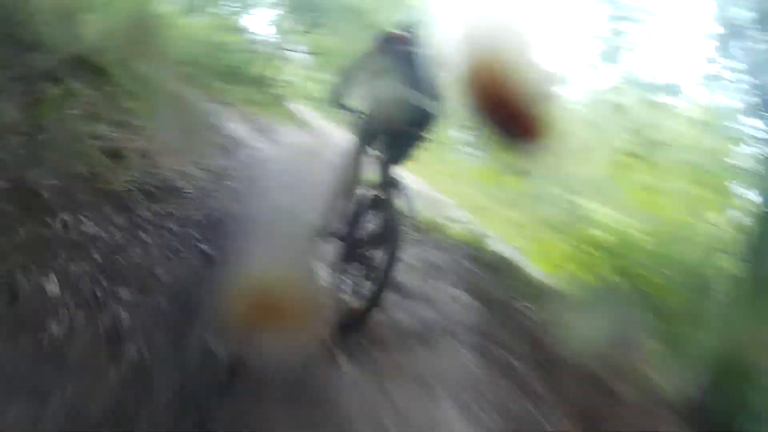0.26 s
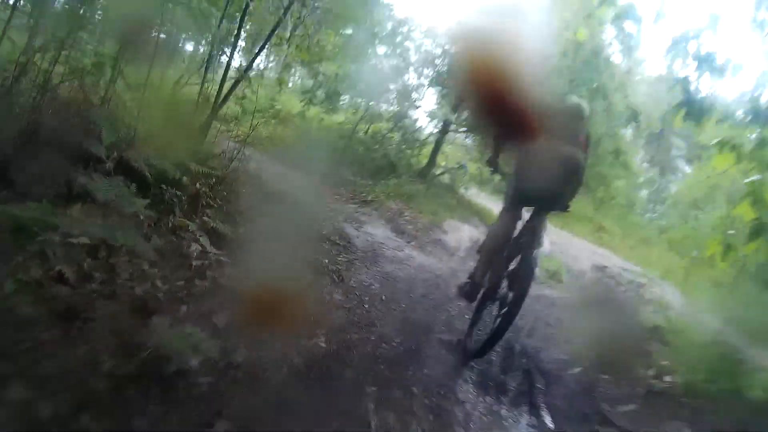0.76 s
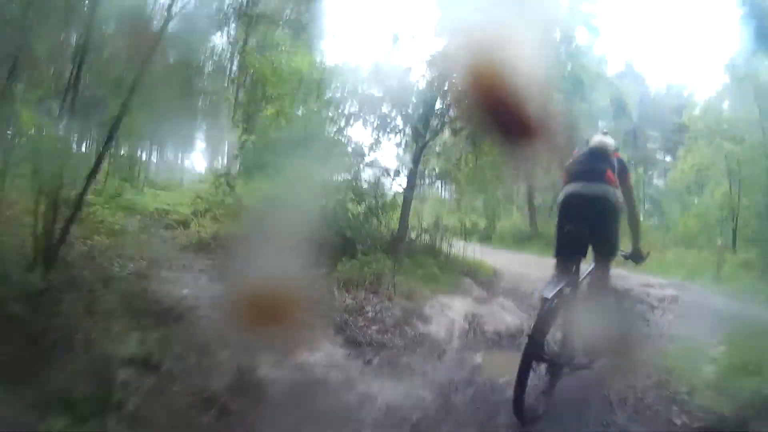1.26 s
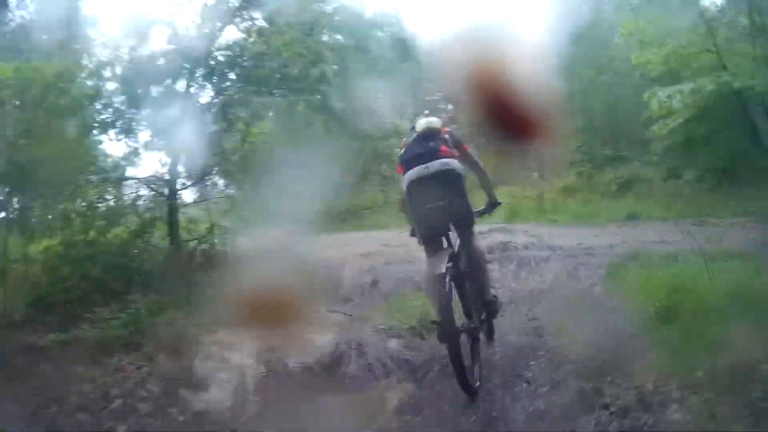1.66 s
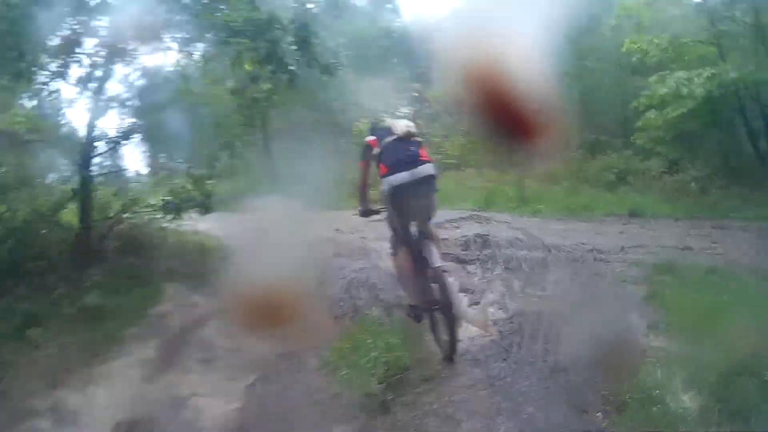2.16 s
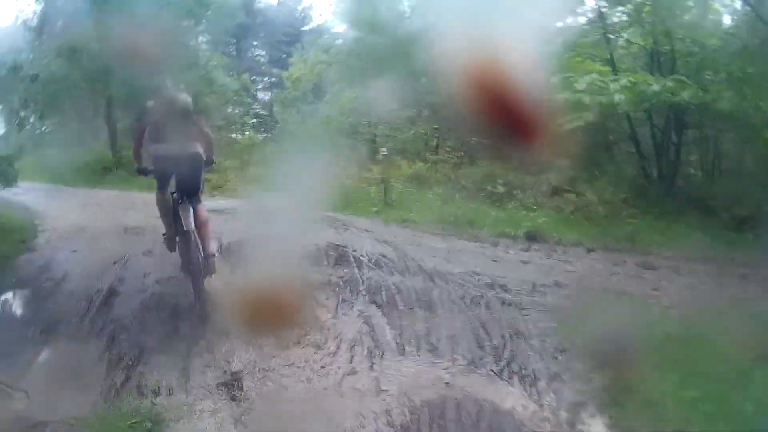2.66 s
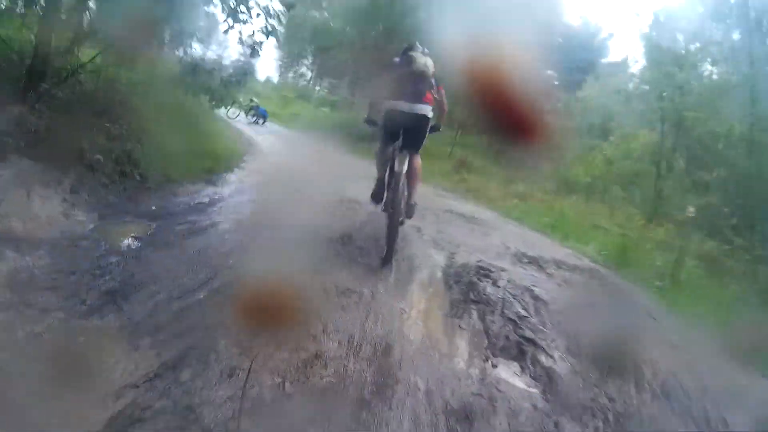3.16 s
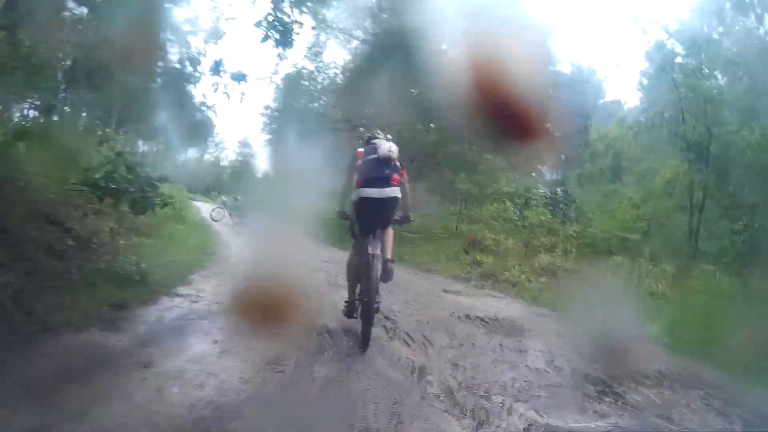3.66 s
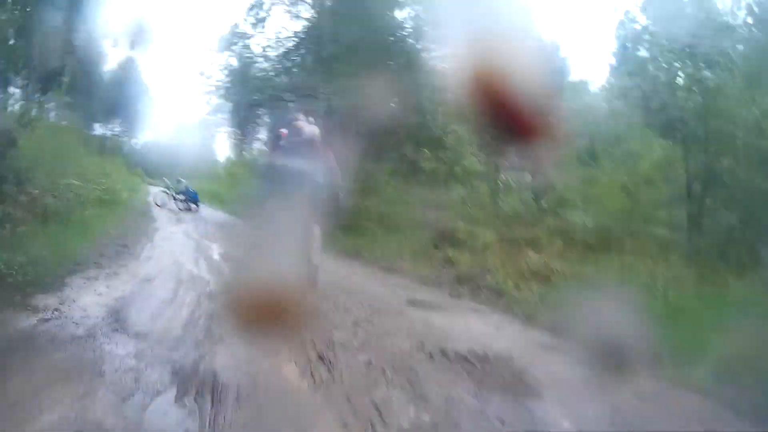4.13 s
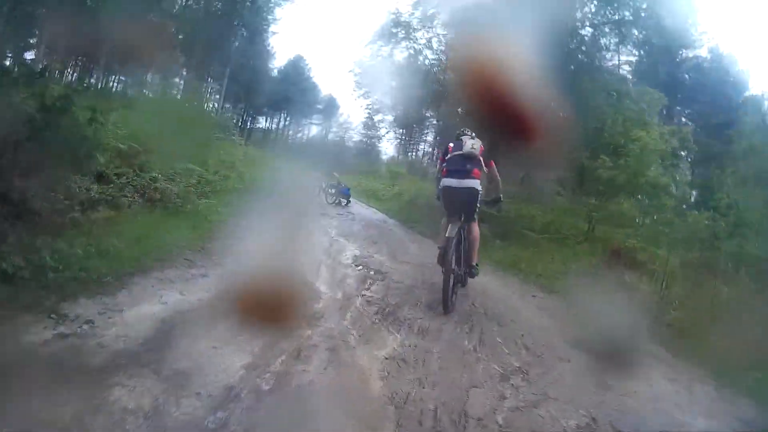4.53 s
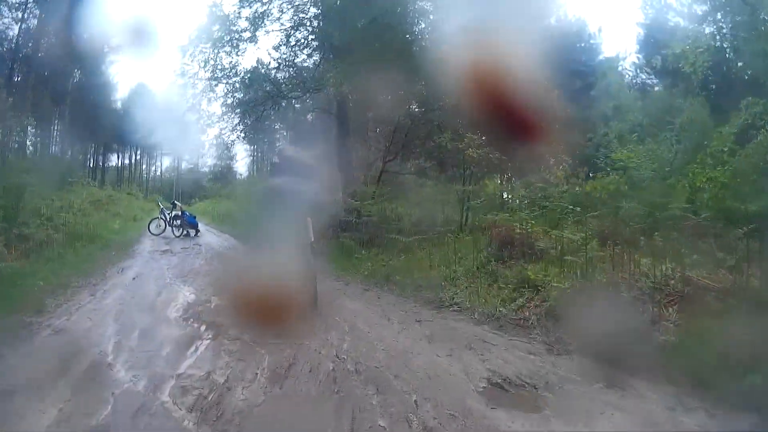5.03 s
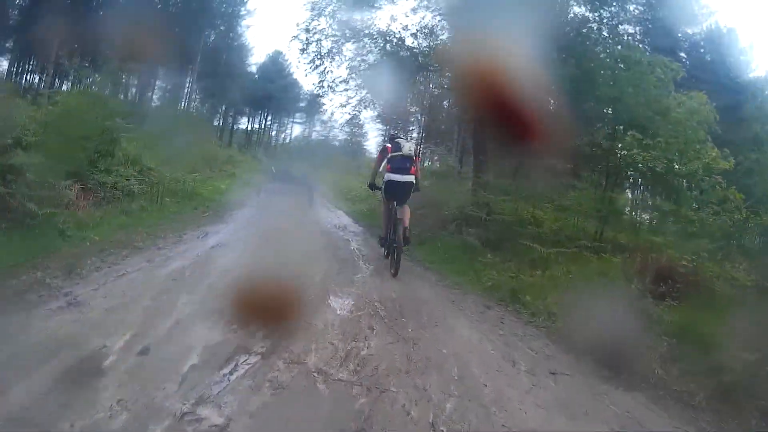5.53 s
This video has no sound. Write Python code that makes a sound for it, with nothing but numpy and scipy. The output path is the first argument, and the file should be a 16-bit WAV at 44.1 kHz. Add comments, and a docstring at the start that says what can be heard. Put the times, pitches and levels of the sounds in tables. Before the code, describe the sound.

Muffled rumble and shudder of a mountain bike riding over mud and grit, with thumps, chain clacks and brief brake disc rings.

```python
"""A mountain bike rides fast down a wet forest trail, heard from a camera in a sealed housing fixed to it.
From the start, tyres and wind rumble, the camera mount shudders near 50 Hz and a low hum dies away.
Bumps thump, the chain slaps the frame, and grit and spray swell in puddles and fade over crests.
After two seconds a brake disc rings now and then. The hardest hits come near three and four seconds,
and the camera turns them down. Then the shudder eases, and a last few slaps end the ride."""
import sys
import numpy as np
from scipy import signal
from scipy.fft import rfft, irfft, next_fast_len
from scipy.io import wavfile
from scipy.ndimage import uniform_filter1d, minimum_filter1d, map_coordinates

SR = 44100
rng = np.random.default_rng(int(sys.argv[2]) if len(sys.argv) > 2 else 0)


def master_out(mix):
    """Clip the mix to full scale and print it as 16-bit PCM to the path in sys.argv[1]."""
    frames = np.transpose(np.atleast_2d(mix))
    ceiling = np.clip(frames, -1, 1)
    pcm = np.round(ceiling * 32767).astype(np.int16)
    wavfile.write(sys.argv[1], SR, pcm)


N = 255308

# Levels in the tables are relative. A fade time (t60) is how long a sound takes to drop by 60 dB.
# The headwind. Each row: time in seconds, level in dB.
HEADWIND = [(0, -39), (0.95, -36), (1.35, -39.5), (2.1, -44.5), (3.1, -32), (3.7, -43), (4.05, -32),
            (4.45, -45), (5.35, -50), (5.79, -46)]
# The trail under the bike. Each row: time in seconds, then shudder, rumble, grit and spray in dB.
TRAIL = [(0, -25, -35, -47.5, -56), (0.9, -24.5, -35, -42.5, -61), (1.35, -27.5, -38, -45, -61.5),
         (1.8, -27.5, -39, -44, -54), (2.8, -26.5, -39, -43.5, -54.5), (3.4, -30, -36.5, -43, -58.5),
         (4.2, -30, -38, -46, -59.5), (4.5, -30, -40, -45.5, -59), (4.9, -31, -39, -42.5, -59),
         (5.79, -38, -40, -44, -59.5)]
# Crests where the tyres go light. Each row: middle and length in seconds, drop in dB.
CRESTS = [(0.202, 0.041, 8.5), (0.674, 0.13, 6.5), (1.218, 0.11, -0.5), (2.106, 0.057, 8.5), (3.26, .09, 2),
          (4.464, 0.12, 9), (4.632, 0.11, 9), (5.301, 0.073, 5)]
# Mud and water. Each row: middle and length in seconds, then change in grit and in spray in dB.
PUDDLES = [(0.433, 0.25, 5.5, 2), (0.816, 0.097, 1.5, 4), (1.1, 0.061, 5.5, 5.5), (1.536, 0.062, 10, 11),
           (2.005, 0.18, 5.5, -0.5), (2.18, 0.11, 3.5, -2), (2.313, 0.076, 5, -7.5), (2.459, 0.051, 8.5, 6),
           (2.944, 0.078, -2.5, 9.5), (3.059, 0.042, 6.5, 5), (3.78, 0.087, 7.5, 2.5),
           (4.03, 0.038, 14, 13), (4.185, 0.11, 6.5, 5.5), (4.81, .08, 3, 1), (5.07, 0.045, 3, -1),
           (5.172, .08, 0.5, 3), (5.351, 0.052, 6.5, 4), (5.557, 0.068, 3.5, 2.5)]
# Drops and mud striking the housing. Each row: start in seconds, level in dB, fade time in seconds.
SPLASHES = [(3.194, -43, 0.037), (3.936, -47.5, 0.019), (4.01, -38.5, 0.036), (4.023, -45, 0.11),
            (4.038, -30.5, 0.0062), (4.044, -41, 0.019), (4.331, -54, .012)]
# The brake disc. Each row: start in seconds, level in dB, pitch in Hz, fade time in seconds.
DISC_RINGS = [(2.31, -42.5, 2110, .29), (2.66, -36.5, 1638, 0.19), (4.33, -58, 2880, .25),
              (4.564, -28, 1636, 0.099), (4.566, -45, 2860, 0.082), (4.72, -33.5, 1710, .22),
              (4.722, -46, 2100, .14), (5.15, -51, 2860, 0.37), (5.335, -35, 1700, 0.092)]
# Chain and stones hitting the frame. Each row: time in seconds, level in dB, brightness in dB.
FRAME_HITS = [(0.1496, -23, -30), (0.4504, -26, -37), (0.5032, -26, -31), (0.829, -15.5, -30),
              (0.8679, -24.5, -39), (1.0788, -28, -31), (1.105, -27.5, -34), (1.2703, -21.5, -22.5),
              (2.14, -30, -41), (2.4474, -25, -32), (3.1107, -21, -39), (3.1951, -10, -24),
              (3.2003, -25, -13.5), (3.3645, -24, -51), (3.6396, -24.5, -23), (3.6845, -26, -38),
              (3.7193, -22, -45), (3.7499, -14.5, -34), (3.7696, -14.5, -33), (3.8053, -20, -16),
              (4.0148, -21.5, -16), (4.0422, -11, -22), (4.051, -17, -23), (4.5625, -31.5, -25),
              (4.788, -21, -22), (5.0045, -23, -45), (5.1446, -23, -15.5), (5.4286, -25, -43),
              (5.5229, -13, -32), (5.5624, -17, -30), (5.5912, -12, -23), (5.6358, -21.5, -40)]
# Bumps in the trail. Each row: start in seconds, level in dB, pitch in Hz, fade time in seconds.
BUMPS = [(.531, -13.5, 160, 0.049), (0.8, -19, 135, .06), (.938, -29, 226, 0.031), (1.104, -8, 235, 0.03),
         (1.503, -20.5, 212.7, 0.17), (1.915, -25.5, 387, 0.099), (1.967, -29, 519, 0.13),
         (2.331, -25, 223, 0.082), (2.564, -21, 190, 0.025), (2.888, -23, 200, 0.031),
         (2.972, -22.5, 223, 0.029), (3.117, -18, 310, 0.011), (3.205, -5, 145, 0.032),
         (3.307, -9, 230, 0.011), (3.469, -18, 170, 0.048), (3.572, -22, 230, 0.024),
         (3.8, -15.5, 214, .058), (3.963, -13, 198, 0.021), (4.003, -19.5, 130, 0.06),
         (4.037, 3, 221, .014), (4.102, -11.5, 216, 0.035), (4.195, -11, 178, 0.021),
         (4.794, -15.5, 410, 0.076), (4.826, -26.5, 700, 0.088), (5.601, -25.5, 429, 0.26),
         (5.603, -28, 130, 0.07)]
# Rough ground that shakes the mount. Each row: start and length in seconds, level in dB.
ROUGH_STRETCHES = [(0.01, 0.088, -20.5), (0.29, 0.1, -36), (0.505, .08, -11.5), (1.106, 0.095, -16),
                   (1.177, .06, -12.5), (1.51, 0.073, -10.5), (1.751, 0.051, -21.5), (1.986, 0.079, -20),
                   (2.441, 0.035, -14), (2.54, 0.076, -23), (2.718, 0.18, -27), (3.045, 0.11, -19),
                   (3.173, 0.073, -10.5), (3.342, 0.21, -16.5), (3.794, 0.025, -17.5), (4.033, 0.021, -9.5),
                   (4.175, 0.05, -17.5)]
# How the frame and the thin housing walls ring. Each row: pitch in Hz, width in Hz, level in dB.
FRAME_MODES = [(420, 29, 4), (738, 48, -1), (796, 37, -4), (1019, 106, 5), (1348, 250, 3), (1613, 166, 5),
               (2490, 167, -9), (2490, 210, -5.5)]
WALL_MODES = [(2043, 67, 0.5), (2253, 132, 1.5), (2723, 96, 1.5), (2893, 60, 2), (3596, 180, -2),
              (3860, 78, 2.5), (4080, 74, -4), (4345, 160, -10)]
# The tone of each noise, from bass to treble. Each row: frequency in Hz, level in dB.
HISS_TONE = [(100, -3), (4500, 1), (6500, 1), (8500, 0.5), (14500, -0.5), (15700, -7.5)]
WIND_TONE = [(15, -23.5), (32, -11), (60, 8), (85, -3), (130, -6.5), (190, -2), (260, -17), (400, -36),
             (1000, -70)]
RUMBLE_TONE = [(30, -4), (90, -5), (140, -8.5), (220, 2), (290, -4.5), (340, -3.5), (410, 2), (480, -1.5),
               (560, -19), (700, -31.5), (1500, -52)]
GRIT_TONE = [(300, -23), (610, -6.5), (685, 0), (750, -9.5), (815, -2), (875, -11), (1010, -0.5),
             (1170, -6.5), (1410, 2.5), (1560, -2.5), (1730, -0.5), (1830, -6.5), (1940, -27.5),
             (4500, -53)]
SWAY_TONE = [(8, -24), (20, -3.5), (35, 0), (55, 1), (78, -6), (110, -20), (250, -35.5), (800, -85.5)]

CREST_SHARE = 0.8  # over a crest, rumble and shudder drop less than the grit


def amp(db):
    """Turn decibels into a volume factor."""
    return 10 ** (np.asarray(db) / 20)


def unit(x):
    """Scale a sound to an average (rms) level of 1."""
    return x / np.sqrt(np.mean(x ** 2) + 1e-20)


def peaked(x):
    """Scale a sound so its highest peak is 1."""
    return x / np.max(np.abs(x))


def curves(rows):
    """Join a table's rows with straight lines: one curve for each column after the time."""
    times, *columns = np.transpose(rows)
    return [np.interp(np.arange(N) / SR, times, column) for column in columns]


def wobble(rate):
    """A smooth curve through `rate` random values a second."""
    return map_coordinates(rng.standard_normal(int(N * rate / SR) + 4), [np.arange(N) * rate / SR])


def swell(middle, length):
    """A smooth hill of height 1, `length` seconds wide at half height."""
    return .5 ** ((2 * (np.arange(N) / SR - middle) / length) ** 2)


def coloured(x, tone):
    """Shape a sound's bass and treble to follow (Hz, dB) points."""
    size = 2 * next_fast_len(len(x) // 2 + 4096)
    hz, db = np.transpose(tone)
    gain_db = np.interp(np.log(np.fft.rfftfreq(size, 1 / SR) + 1), np.log(hz), db)
    cepstrum = irfft(np.log(amp(gain_db)))
    # fold the filter so that it rings only after a hit, never before
    cepstrum[1:size // 2] *= 2
    cepstrum[size // 2 + 1:] = 0
    return irfft(rfft(x, size) * np.exp(rfft(cepstrum)))[:len(x)]


def resonate(x, modes):
    """Let a sound ring an object at its natural pitches."""
    size = next_fast_len(len(x) + 4096)
    f = np.fft.rfftfreq(size, 1 / SR)
    body = sum((-1) ** k * amp(db) * 1j * f * width / (hz * hz - f * f + 1j * f * width)
               for k, (hz, width, db) in enumerate(modes))
    return irfft(rfft(x, size) * body, size)[:len(x)]


def lowpass(x, hz, order):
    """Muffle everything above hz; a higher order cuts more steeply."""
    return signal.sosfilt(signal.butter(order, hz, fs=SR, output="sos"), x)


def add(track, start, sound):
    """Mix a sound in at `start` seconds."""
    first = max(0, round(start * SR))
    track[first:first + len(sound)] += sound[:max(0, N - first)]


def grains(rate, spread_db):
    """Tiny random impacts of uneven size, about `rate` a second."""
    size = amp(spread_db * np.clip(rng.standard_normal(N), -2, 2)) * rng.choice([-1, 1], N)
    return unit(size * (rng.random(N) < rate / SR))


def wind(gust_db=4):
    """The headwind buffets the housing in quick, dull gusts."""
    wind_db, = curves(HEADWIND)
    return amp(wind_db + gust_db * wobble(22)) * unit(coloured(rng.standard_normal(N), WIND_TONE))


def hum(hz, db, t60):
    """A low, wavering hum dies away at the start of the ride."""
    t = np.arange(N) / SR
    return amp(db - 60 * t / t60 + 2 * wobble(30)) * np.sin(2 * np.pi * hz * t)


def splashes():
    """Splashes tick directly on the housing, so they keep their treble."""
    out, t = np.zeros(N), np.arange(SR // 30) / SR
    tone = [(1500, -12.5), (4000, 11), (7000, -1), (9000, -12.5), (12000, -11), (15000, -15)]
    for start, db, t60 in SPLASHES:
        tick = rng.standard_normal(len(t)) * amp(-60 * t / t60)
        add(out, start, amp(db) * peaked(coloured(tick, tone)))
    return out


def brake_disc():
    """The disc brushes its pads and gives short, slightly rough rings."""
    out, t = np.zeros(N), np.arange(SR // 3) / SR
    for start, db, hz, t60 in DISC_RINGS:
        roughness = 0.012 * np.cumsum(rng.standard_normal(len(t)))
        level = amp(db - 60 * t / t60) * (1 - np.exp(-t / 0.001))
        add(out, start, level * np.sin(2 * np.pi * hz * t + roughness))
    return out


def crest_drop():
    """How many dB quieter the grit gets as the tyres go light over crests."""
    return sum(db * swell(middle, length) for middle, length, db in CRESTS)


def tyre_levels():
    """Rumble, grit and spray in dB: crests lower all three, and puddles mostly raise the last two."""
    _, rumble_db, grit_db, spray_db = curves(TRAIL)
    drop_db = crest_drop()
    for middle, length, mud_db, water_db in PUDDLES:
        depth = swell(middle, length)
        grit_db += mud_db * depth
        spray_db += water_db * depth
    return rumble_db - CREST_SHARE * drop_db, grit_db - drop_db, spray_db - drop_db


def tyres():
    """Rubber knobs drum on the ground, crush wet grit, pop mud and throw spray at the housing."""
    rumble_db, grit_db, spray_db = tyre_levels()
    ground = wobble(45)  # uneven ground moves all three levels at once
    knobs = grains(rate=500, spread_db=2)
    rumble = unit(coloured(knobs, RUMBLE_TONE))
    crunch = grains(rate=900, spread_db=2.5) + 0.78 * rng.standard_normal(N)
    grit = unit(coloured(crunch, GRIT_TONE))
    bursts = lowpass(np.abs(grains(rate=45, spread_db=1.5)), hz=127, order=2)  # a few milliseconds each
    mud_pops = unit(resonate(bursts * rng.standard_normal(N), FRAME_MODES))
    spray = unit(resonate(grains(rate=2200, spread_db=3.5), WALL_MODES))
    return (amp(rumble_db - 3 + 1.4 * ground) * rumble
            + amp(grit_db - 1.5 + 2.26 * ground) * (grit + amp(-7) * mud_pops)
            + amp(spray_db - 0.54 + 1.6 * ground) * spray)


def stones(per_second=7, spread_db=2.5, bright_db=-29):
    """Small stones flick up at random, harder where the grit is loud. Gives rows like FRAME_HITS."""
    grit_db = tyre_levels()[1]
    hit_samples = np.flatnonzero(rng.random(N) < per_second / SR)
    level_db = grit_db + 11.5 + spread_db * rng.standard_normal(N)
    return [(i / SR, level_db[i], bright_db) for i in hit_samples]


def frame_slaps():
    """Chain links and stones hit the frame and make it ring; bright hits also ring the housing."""
    out, t = np.zeros(N), np.arange(SR // 16) / SR
    lead_s = 0.0028  # the first links touch ahead of the main blow
    rise = amp(-18 * np.maximum(1 - t / lead_s, 0))
    since_blow = np.maximum(t - lead_s, 0)
    for time, db, bright_db in FRAME_HITS + stones():
        t60 = 0.018 * amp(-.35 * (db + 8))  # soft slaps drag on longer than hard ones
        fade = amp(-60 * since_blow / t60) + amp(-25 - 60 * since_blow / 0.086)
        on_frame, on_walls = rise * fade * rng.standard_normal((2, len(t)))
        clack = peaked(lowpass(resonate(on_frame, FRAME_MODES), hz=2870, order=6))
        click = peaked(resonate(on_walls, WALL_MODES))
        add(out, time - .003, amp(db - 1.35) * (clack + amp(bright_db + 7) * click))
    return out


def thump(t, hz, rise_s, t60):
    """A low note that starts quickly and dies away."""
    return -np.sin(2 * np.pi * hz * t) * (1 - np.exp(-t / rise_s)) * amp(-60 * t / t60)


def bumps():
    """Each bump jolts the frame, with a dull judder and the low thud of the frame flexing."""
    out, t = np.zeros(N), np.arange(SR // 6) / SR
    thud = peaked(thump(t, hz=104, rise_s=0.0024, t60=0.072))
    for start, db, hz, t60 in BUMPS:
        jolt = peaked(lowpass(thump(t, hz, rise_s=0.00039, t60=t60), hz=543, order=4))
        shaking = rng.standard_normal(len(t)) * amp(-60 * t / (1.5 * t60))
        judder = peaked(coloured(shaking, RUMBLE_TONE))
        thud_db = -7 - 12.5 * max(np.log2(hz / 200), 0)  # bumps above 200 Hz are lighter and thud less
        add(out, start - .0005, amp(db - 3.5) * (jolt + amp(-5.5) * judder + amp(thud_db) * thud))
    return out


def shudder(start, length, rise_s=0.02, t60=0.23):
    """The mount's shaking builds up, holds while the ground is rough and then dies away."""
    t = np.arange(N) / SR - start
    return np.clip(t / rise_s, 0, 1) * amp(-60 * np.maximum(t - length, 0) / t60)


def camera_mount(hz=49.9, drift_hz=1.98, swing_db=4):
    """The camera rocks on its mount at one low, wandering pitch, over a noisy sway."""
    trail_db = curves(TRAIL)[0] - CREST_SHARE * crest_drop() + swing_db * wobble(17)
    rough_power = sum((amp(db) * shudder(start, length)) ** 2 for start, length, db in ROUGH_STRETCHES)
    level = np.sqrt(amp(trail_db) ** 2 + rough_power)
    pitch_hz = hz + drift_hz * wobble(27)
    rocking = np.sqrt(2) * np.sin(2 * np.pi * np.cumsum(pitch_hz) / SR)
    sway = unit(coloured(rng.standard_normal(N), SWAY_TONE))
    return level * (amp(-0.53) * rocking + amp(-7) * sway)


def scene():
    """The sealed housing shuts out the treble of everything that comes through it."""
    bike = camera_mount() + wind() + tyres() + frame_slaps() + bumps() + brake_disc()
    bike += hum(hz=285.4, db=-25, t60=0.44)
    return (lowpass(bike, hz=4600, order=10) + splashes())[None]


def gain_control(x, threshold_db, strength, release_s):
    """The volume is turned down at once when the sound is loud, then creeps back."""
    peaks = -minimum_filter1d(-np.abs(x), size=SR // 50)
    keep = np.exp(-1 / (release_s * SR))
    quick = uniform_filter1d(peaks, size=SR // 100)
    slow = signal.lfilter([1 - keep], [1, -keep], peaks)
    excess = np.maximum(quick, slow) / amp(threshold_db)
    return x * np.maximum(excess, 1) ** -strength


def record(dry, top_hz=15750):
    """The camera adds hiss and a faint whine, turns loud moments down and cuts the highest treble."""
    hiss = amp(-70) * unit(coloured(rng.standard_normal(N), HISS_TONE))
    whine = amp(-89.5) * unit(resonate(rng.standard_normal(N), [(9483, 12, 0.013), (9556, 8, 0.011)]))
    levelled = gain_control(dry[0] + hiss + whine, threshold_db=-15.5, strength=0.4, release_s=0.075)
    in_range = np.fft.rfftfreq(N, 1 / SR) < top_hz
    return irfft(rfft(levelled) * in_range, N)[None]


dry = scene()
out = record(dry)
master_out(out)
```